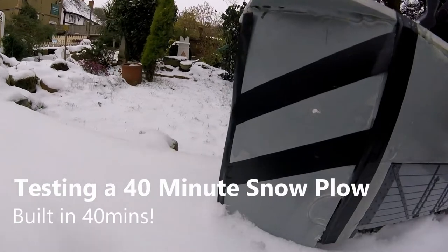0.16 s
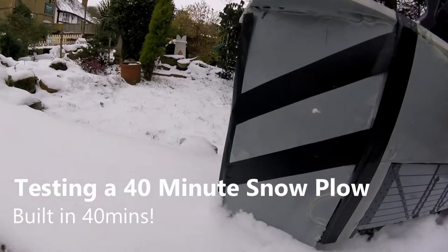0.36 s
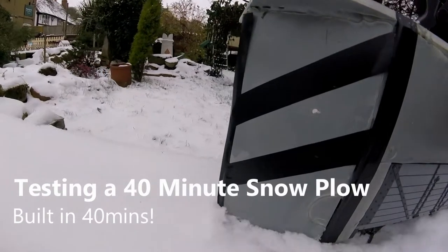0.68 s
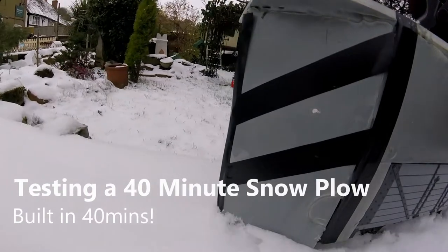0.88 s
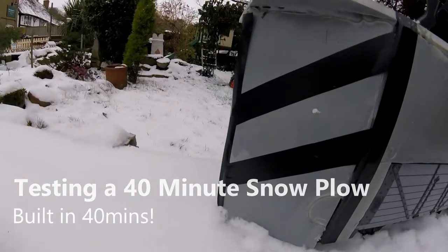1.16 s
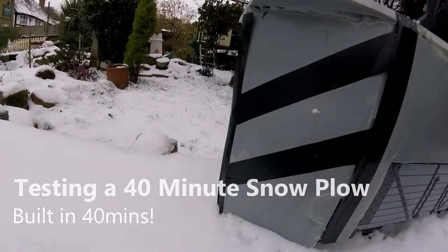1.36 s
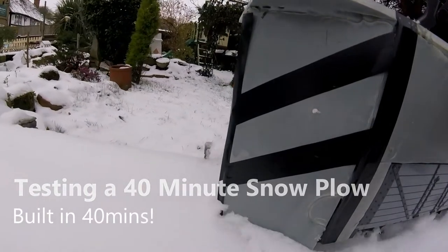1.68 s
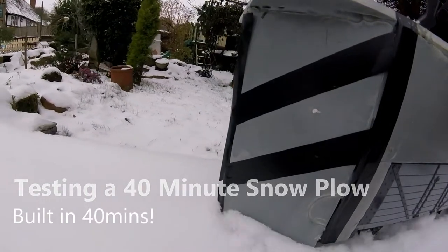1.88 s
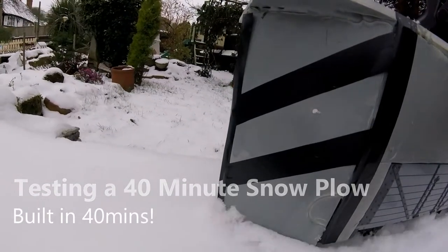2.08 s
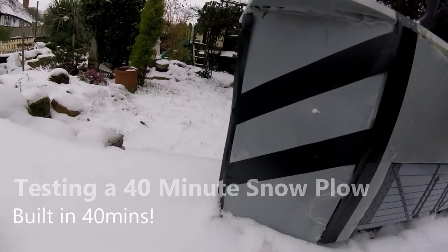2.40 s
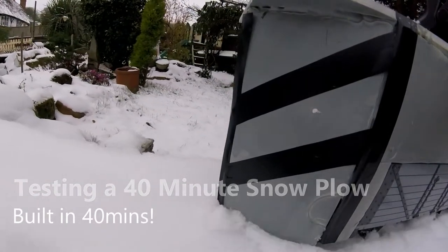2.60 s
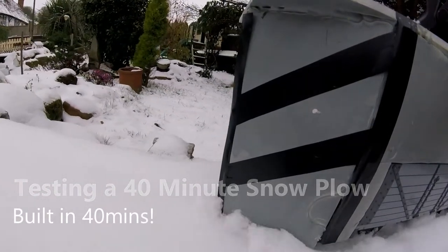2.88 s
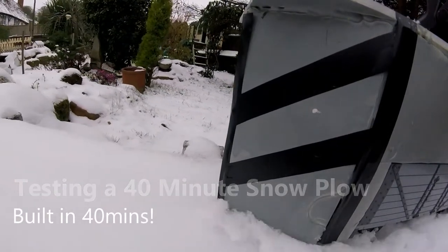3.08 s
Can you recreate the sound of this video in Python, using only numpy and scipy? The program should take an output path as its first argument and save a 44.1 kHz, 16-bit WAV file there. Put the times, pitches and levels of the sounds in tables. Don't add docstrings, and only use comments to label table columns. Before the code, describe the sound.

Model train pushing a snow plough, low booming lurches, gritty gear clatter and hissing, crackling snow

```python
import sys
import numpy as np
from scipy import signal
from scipy.io import wavfile
from scipy.ndimage import uniform_filter1d

SR = 44100
rng = np.random.default_rng(int(sys.argv[2]) if len(sys.argv) > 2 else 0)


def dump(signal):
    limited = np.clip(np.atleast_2d(signal).T, -1, 1)
    pcm = np.round(limited * 32767).astype(np.int16)
    wavfile.write(sys.argv[1], SR, pcm)


def nominal_scale(level):
    x = np.asarray(level, float) / 20
    return 10 ** x


N = 143325

# time in seconds, turns per second [Hz].
SHAFT_SPEED = [(0.0, 15.3), (0.1, 14.7), (0.41, 15.1), (0.53, 15.3), (0.89, 15.46), (1.66, 16.23),
               (1.84, 16.3), (3.2, 16.44), (3.25, 16.6)]
# start in seconds, level in dB, time held in seconds, pitch in Hz.
MOUNT_LURCHES = [(-.02, -20, .03, 77), (.015, -16, 0.023, 77), (0.079, -12, 0.036, 77),
                 (0.159, -19, 0.061, 77), (.25, -23, 0.022, 72), (0.311, -18, 0.017, 71.6),
                 (0.357, -14.5, 0.06, 87.6), (0.42, -10, 0.012, 72.5), (0.494, -11.5, 0.044, 74.8),
                 (.6, -24.5, 0.016, 71.83), (0.743, -18, 0.043, 76), (0.881, -18.5, 0.018, 74),
                 (.99, -14, 0.075, 78.46), (1.101, -13.5, 0.029, 77.93), (1.19, -20, 0.027, 75.5),
                 (1.243, -14.5, 0.033, 72.2), (1.359, -12.5, 0.025, 76.2), (1.419, -17, 0.11, 77),
                 (1.51, -14.5, .03, 77), (1.616, -21, .04, 78.52), (1.67, -23.5, .09, 77),
                 (1.854, -17.5, 0.035, 73.98), (1.95, -24, .05, 72.7), (2.038, -16, 0.023, 72.74),
                 (2.19, -12, 0.033, 77.5), (2.259, -16.5, 0.056, 77.7), (2.365, -15.5, .02, 69.8),
                 (2.441, -14.5, 0.032, 76.23), (2.568, -18, 0.066, 77), (2.75, -19, 0.057, 79.1),
                 (2.84, -20.5, 0.067, 77.97), (2.98, -19, 0.086, 78.17), (3.1, -22, 0.03, 78.4),
                 (3.16, -28, 0.043, 77)]
# time in seconds, level in dB.
GEAR_LOAD = [
    (0, -1),
    (1, 1.5),
    (1.7, -0.5),
    (2.2, -4),
    (2.5, -6.5),
    (3.25, -6.5),
]
# time in seconds, narrow ring in dB, tooth mesh in dB.
GEAR_WHINE = [(0, -8, 2), (.3, -8, -0.5), (.7, -4.5, -1), (1, -2, 1), (1.15, 6, 0), (1.4, 4, 2),
              (1.7, 0, 1), (1.8, -8, -0.5), (2.3, -10, 1), (2.6, -5, 1.5), (2.9, -7, 1.5), (3.25, -5, 1)]
GLITCH_S = .49143


def curve(rows, col):
    return np.interp(np.arange(N) / SR, [r[0] for r in rows], [r[col] for r in rows])


def level(x, db):
    return x * nominal_scale(db) / np.sqrt(np.mean(x ** 2))


def band(x, hz, width):
    edges = [hz - width / 2, hz + width / 2]
    return signal.sosfilt(signal.butter(2, edges, "bandpass", fs=SR, output="sos"), x)


def noise():
    return rng.standard_normal(N)


def walk(rate):
    k = int(SR / 100 / rate) + 1
    slow = uniform_filter1d(uniform_filter1d(rng.standard_normal(N // 100 + 2), k), k)
    return np.interp(np.arange(N) / 100, np.arange(len(slow)), (slow - slow.mean()) / slow.std())


def cracks():
    # time in seconds, peak level in dB, colour in Hz.
    snaps = [(0.0174, -32.5, 5560), (0.1166, -44, 5770), (0.4903, -24, 5020), (0.608, -36, 4800),
             (0.6943, -41, 6300), (0.7183, -35, 5770), (0.7652, -43, 5150), (0.7786, -42, 5820),
             (0.9208, -40, 6410), (1.1049, -33.5, 6380), (1.1862, -37, 5200), (1.2321, -40, 5150),
             (1.3448, -44, 6393), (1.4586, -38, 5370), (1.492, -41, 5550), (1.5424, -34, 5920),
             (1.6651, -49, 6410), (1.8617, -37, 5280), (1.9121, -38, 5480), (2.1061, -34, 6380),
             (2.2179, -37, 5323), (2.2762, -40, 5370), (2.3481, -46, 6680), (2.4214, -39, 5276),
             (2.4304, -35.5, 5290), (2.4723, -39, 6600), (2.6309, -42, 6540), (2.6494, -39, 5930),
             (2.6928, -40, 5880), (2.7257, -39, 6630), (2.823, -44, 5334), (2.9043, -44, 6410),
             (3.2226, -43, 5390)]
    decay_s, gain_db = 0.0041, 3
    width_hz, edge_db = 1670, -7

    def colour(x, lo, hi):
        return signal.sosfilt(signal.butter(4, [lo, hi], "bandpass", fs=SR, output="sos"), x)

    out = np.zeros(N)
    fade = np.exp(-np.arange(1500) / (decay_s * SR))
    bursts = rng.standard_normal((len(snaps), len(fade))) * fade
    for (s, db, hz), burst in zip(snaps, bursts):
        body = colour(burst, hz - width_hz / 2, hz + width_hz / 2)
        edge = nominal_scale(edge_db) * colour(burst * fade, 4700., 8500.)
        apart = abs(s - GLITCH_S) > .01
        i = int(s * SR)
        out[i:i + len(fade)] += (nominal_scale(db + gain_db) * apart * (body + edge))[:N - i]
    return out


def snow():
    # centre in Hz, width in Hz, level in dB.
    housing = [(2217, 710, -1), (2580, 560, -2.5), (2922, 140, -7), (3440, 110, -4.5), (3680, 920, -8),
               (3936, 110, -2.5), (4177, 120, -5), (5160, 720, -6.5), (5770, 800, -6), (6520, 410, -4),
               (7130, 1530, -12.5), (8650, 1740, -16), (11000, 3800, -26.5)]
    # time in seconds, level in dB.
    push = [(0, 2.5), (.05, 0), (.3, 1.5), (.8, -.5), (1, 1), (1.12, 3.5), (1.3, 1), (1.55, 2), (1.75, 1),
            (2, 2), (2.4, 0.5), (2.8, 0), (3.25, 0)]
    # time in seconds, level in dB.
    scrape = [(0, 6), (.1, 0), (.4, -0.5), (.9, -0.5), (1.4, 1.5), (1.8, -1.5), (2.2, -1.5), (2.5, 3),
              (2.8, 1), (3, 2.5), (3.25, 2)]
    hiss_db, crunch_db, crunch_per_s = -50.5, -64.5, 520
    scrape_top_hz = 3000

    grains = rng.random(N) < crunch_per_s / SR
    crunch = grains * nominal_scale(1.1 * rng.exponential(size=N)) * noise()
    flicker = 0.55 * walk(29)
    hiss_sum, crunch_sum = 0, 0
    for hz, width, db in housing:
        swell_db = db + curve(scrape if hz < scrape_top_hz else push, 1)
        hiss_sum += nominal_scale(swell_db + flicker + 0.95 * walk(18)) * band(noise(), hz, width)
        crunch_sum += nominal_scale(swell_db) * band(crunch, hz, width)
    return level(hiss_sum, hiss_db) + level(crunch_sum, crunch_db) + cracks()


def turning(count):
    turns = np.cumsum(curve(SHAFT_SPEED, 1)) / SR
    angle = np.linspace(0, 1, count)
    patterns = rng.standard_normal((3, count))
    return sum(nominal_scale(1.9 * walk(2.1)) * np.interp(turns % 1, angle, p) for p in patterns)


def whine():
    # mode in Hz, width in Hz, level in dB.
    ring = [(3463, 100, -63.5), (2420, 250, -66.5), (2760, 100, -68.5), (3930, 72, -72.5)]
    rough = turning(count=1025)
    return nominal_scale(curve(GEAR_WHINE, 1)) * sum(level(band(rough, hz, w), db) for hz, w, db in ring)


def mesh():
    teeth, mesh_db, flutter_hz = 50.5, -44, 150
    spin = 2 * np.pi * teeth * np.cumsum(curve(SHAFT_SPEED, 1)) / SR
    rough = walk(flutter_hz) * np.sin(spin) + walk(flutter_hz) * np.cos(spin)
    return nominal_scale(curve(GEAR_WHINE, 2)) * level(rough, mesh_db)


def gears():
    # mode in Hz, width in Hz, level in dB, share that follows the load (0-1).
    shell_modes = [(557, 113, -5.5, 0), (681, 82, -6.5, 0), (794, 140, -3.5, .05), (943, 117, -5, 0.7),
                   (1066, 84, -1, 0.64), (1154, 66, -11.5, 1), (1283, 114, -2.5, .9), (1422, 82, -9.5, 0.7),
                   (1518, 190, -8, 0.95)]
    teeth = (40, 42, 46, 47, 48, 49, 50, 51, 52, 53, 71, 83, 98, 133)
    teeth_db = [-51.5, -54.5, -52.5, -50, -52, -53, -53, -48.5, -49.5, -54, -56, -57.5, -60.5, -66.5]
    repeat_db, loose_db, shell_db = -35.5, -19, -37

    turns = np.cumsum(curve(SHAFT_SPEED, 1)) / SR
    load_db, mesh_db = curve(GEAR_LOAD, 1), curve(GEAR_WHINE, 2)
    clatter = level(turning(count=513), repeat_db) + level(noise(), loose_db)
    tones = 0
    for k, db in zip(teeth, teeth_db):
        loudness = np.sqrt(2) * nominal_scale(db + mesh_db + 1.2 * walk(6))
        uneven_turns = turns + 0.0021 * walk(5.7)
        tones += loudness * np.sin(2 * np.pi * k * uneven_turns)
    shell = 0
    for k, (hz, width, db, share) in enumerate(shell_modes):
        loudness = nominal_scale(db + share * load_db + 0.63 * walk(7.6))
        shell += (-1) ** k * loudness * band(clatter, hz, width)
    return level(shell, shell_db) + tones


def lurching():
    attack_s, t60_s, gain_db = 0.0083, 0.16, -1.5
    t = np.arange(0, N + 50, 50) / SR
    swing = 0
    for start, db, held, _ in MOUNT_LURCHES:
        rise = np.clip((t - start) / attack_s, 0, 1) ** 2
        fall = nominal_scale(-60 * np.maximum(t - start - attack_s - held, 0) / t60_s)
        swing = np.maximum(swing, nominal_scale(db + gain_db) * rise * fall)
    return np.interp(np.arange(N) / SR, t, uniform_filter1d(swing, size=4))


def frame(swing):
    # time in seconds, level in dB.
    joints = [(.12, -30), (0.229, -30.5), (0.363, -23), (0.411, -21.5), (0.502, -30), (.58, -27),
              (1.061, -26.5), (1.126, -21), (1.25, -34), (2.58, -33.5), (2.749, -31.5), (2.95, -30),
              (3.03, -31.5)]
    # mode in Hz, width in Hz, rumble in dB, knock in dB.
    modes = [(32, 24, -35.5, -25), (59.1, 32.3, -28, -12.5), (77, 9, -31, -18.5), (116.3, 19, -35, 4.5),
             (182, 112, -51, -20), (231.6, 25.6, -42.5, -4.5), (284.2, 68, -42.5, -12),
             (349, 45.4, -40, -12), (412, 32.6, -43.5, -23), (492, 87, -42, -23)]
    load_share, swing_share, swing_top_hz = 0.36, 0.27, 296

    knocks = np.zeros(N)
    for s, db in joints:
        knocks[int(s * SR)] = nominal_scale(db) * SR / 60
    shaken = uniform_filter1d(swing, size=900) + nominal_scale(-30)
    load_db = load_share * curve(GEAR_LOAD, 1)
    out = 0
    for hz, width, rumble_db, knock_db in modes:
        follow = swing_share * max(1 - hz / swing_top_hz, 0)
        rolling = noise() * shaken ** follow * nominal_scale(load_db + 1.6 * walk(5.4))
        out += level(band(rolling, hz, width), rumble_db) + nominal_scale(knock_db) * band(knocks, hz, width)
    return out


def mount(swing):
    pitches = [(start + held / 2, hz) for start, _, held, hz in MOUNT_LURCHES]
    hz = curve(pitches, 1) * (1 + 0.022 * walk(25))
    return np.sqrt(2) * swing * nominal_scale(0.83 * walk(35)) * np.sin(2 * np.pi * np.cumsum(hz) / SR)


def scene():
    swing = lurching()
    return (snow() + whine() + mesh() + gears() + frame(swing) + mount(swing))[None]


def camera(x):
    top_hz, edge_spread_hz = 14000, 400
    holes_from_hz, hole_db = 8000, -0.7
    hz, _, z = signal.stft(x, SR, nperseg=2048, noverlap=1024, window="cosine")
    hz = hz[:, None]
    power = uniform_filter1d(uniform_filter1d(np.abs(z) ** 2, size=9, axis=0), size=2, axis=1)
    usual = uniform_filter1d(power, size=41, axis=0)
    edge_hz = top_hz + edge_spread_hz * uniform_filter1d(rng.standard_normal(z.shape[1]), size=3)
    ease = np.clip((hz - holes_from_hz) / 1500, 0, 1)
    keep = (power > ease * usual * nominal_scale(2 * hole_db)) & (hz < edge_hz)
    return signal.istft(z * keep, SR, nperseg=2048, noverlap=1024, window="cosine")[1][:N]


def dropout():
    step_db, fade_s, top_hz = -11.5, 0.0023, 16700
    late = np.arange(N) / SR - GLITCH_S
    step = -nominal_scale(step_db) * (late >= 0) * np.exp(-np.abs(late) / fade_s)
    return np.convolve(step, signal.firwin(129, top_hz, fs=SR), "same")


def low_pass(x):
    return signal.sosfilt(signal.butter(12, 16820, fs=SR, output="sos"), x)


def record(dry):
    mix = camera(dry[0])[None] + dropout()
    return low_pass(mix)


dry = scene()
out = record(dry)
dump(out)
```